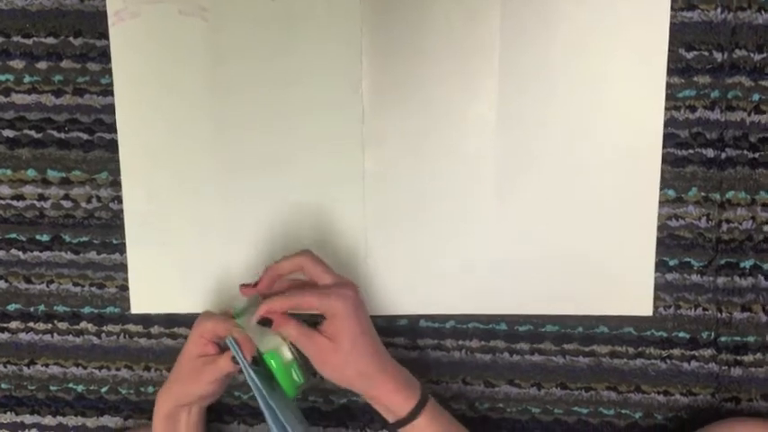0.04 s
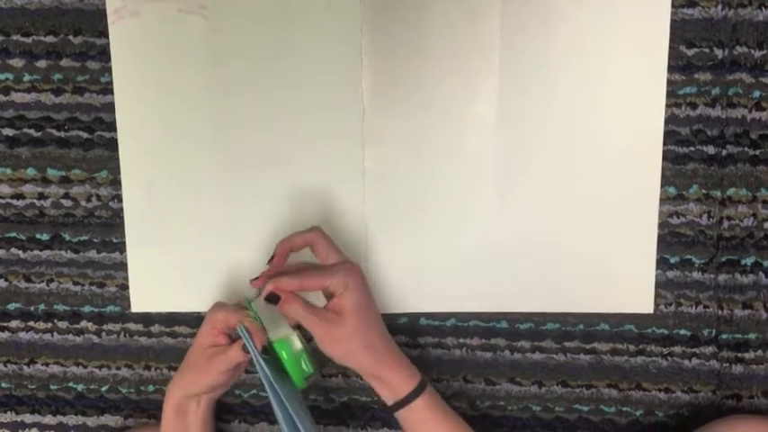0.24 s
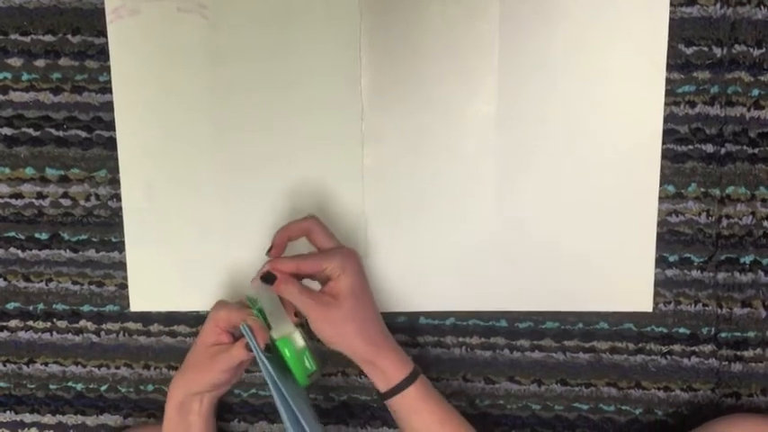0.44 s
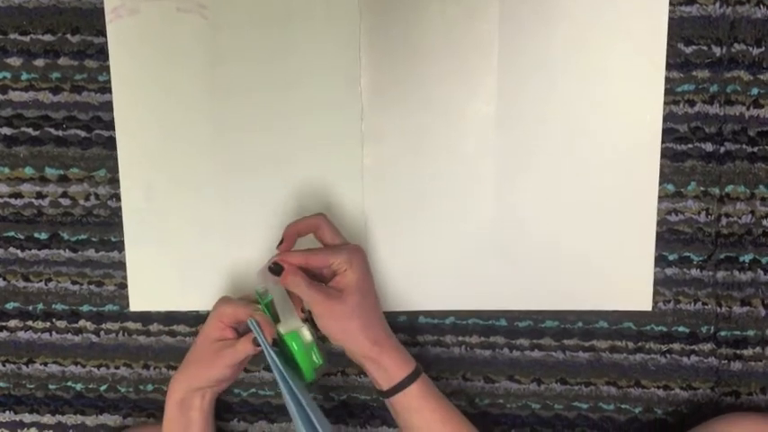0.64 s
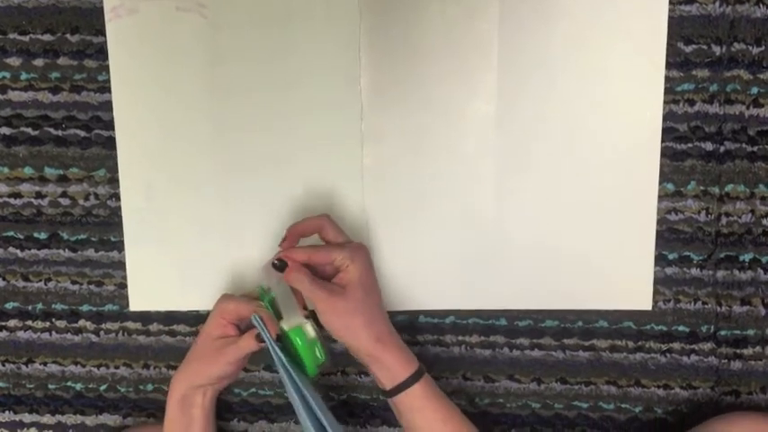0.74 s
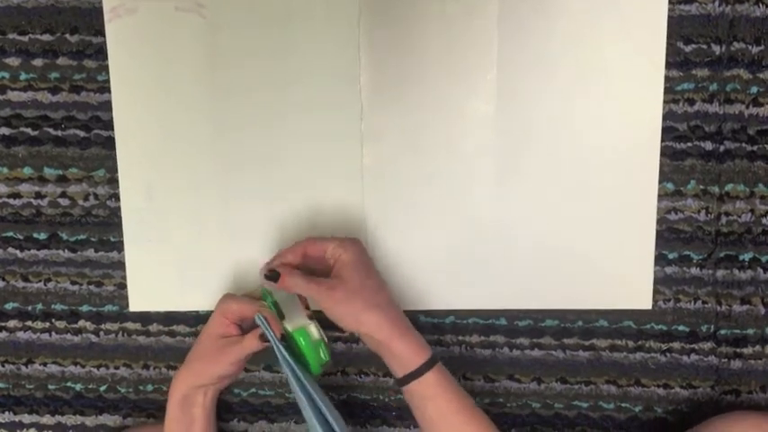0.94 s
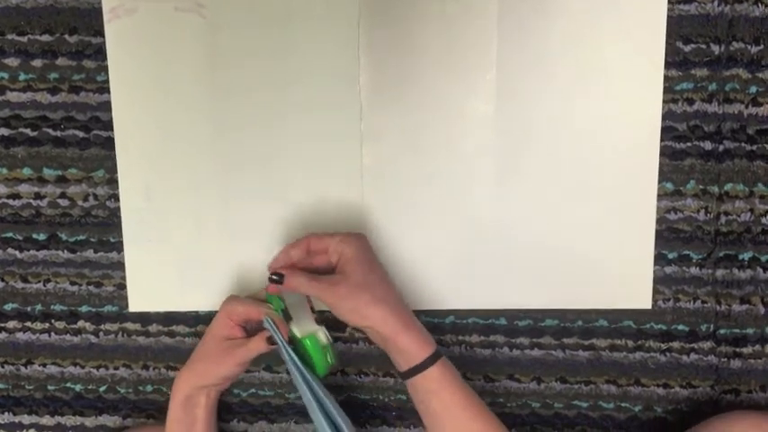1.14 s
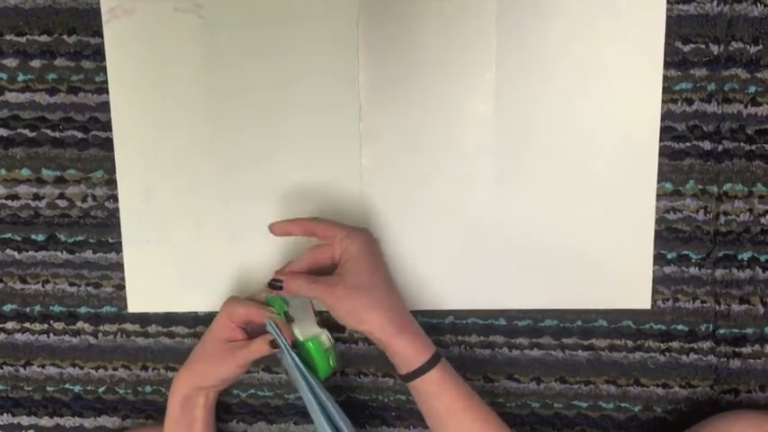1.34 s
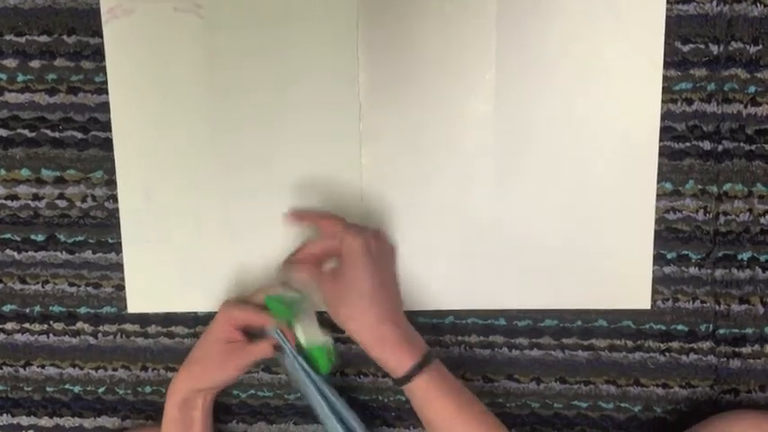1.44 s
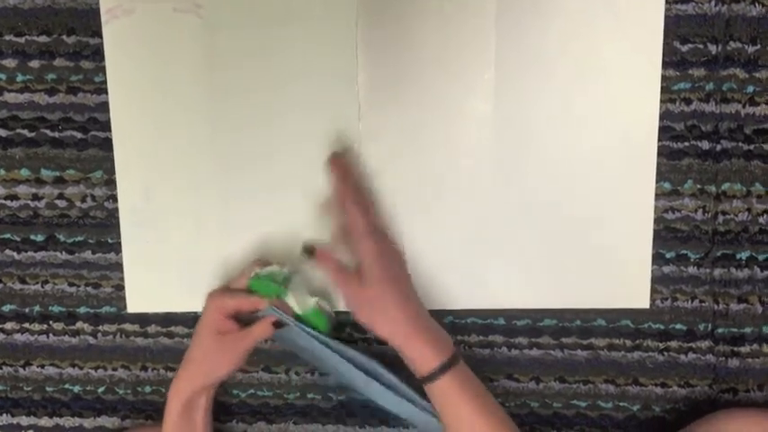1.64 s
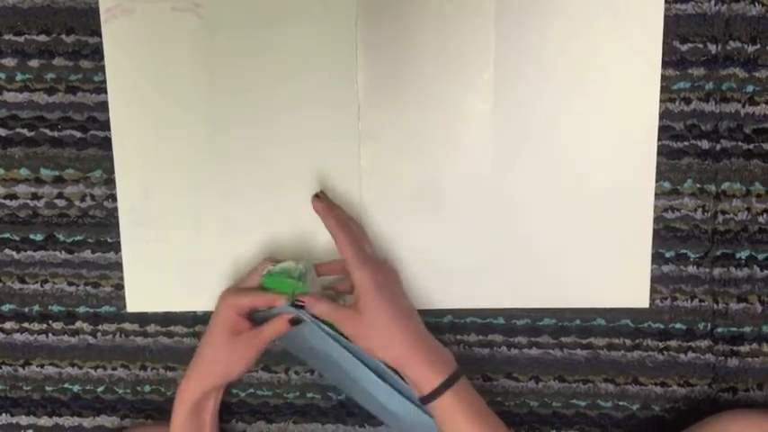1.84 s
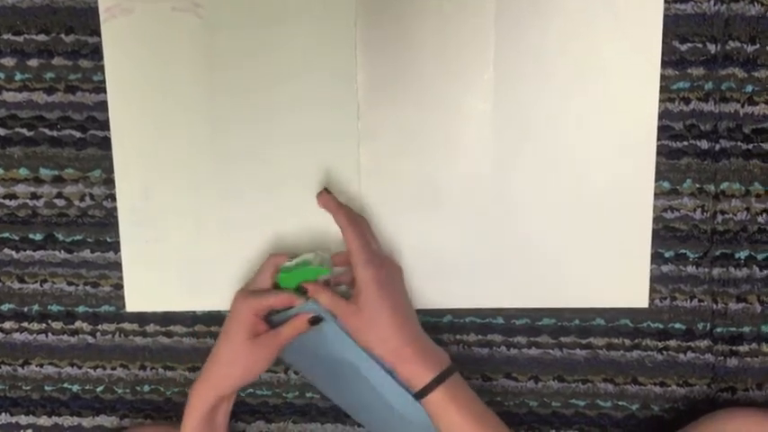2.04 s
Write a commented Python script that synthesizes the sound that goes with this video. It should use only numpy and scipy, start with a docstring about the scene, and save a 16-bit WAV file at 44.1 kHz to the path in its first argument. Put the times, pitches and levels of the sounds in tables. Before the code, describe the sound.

Close by in a quiet room, adhesive tape crackles loudly as it comes off its roll. About a second later come small fingernail clicks and a short, quieter tear, followed by light finger touches over a faint low rumble.

```python
"""Sticky tape is pulled from a small plastic dispenser, close by in a carpeted room.
The roll sticks and slips in seven loud snaps: each time the glue cracks loose and the shell rings.
After a pause the tape rips across the cutter with a soft thump. Nails click, fingers tick and brush
on tape and paper, and dull thuds come and go over a low room rumble and a faint ventilation hum."""
import sys
import numpy as np
from scipy import signal
from scipy.fft import rfft, irfft
from scipy.io import wavfile

SR = 44100
rng = np.random.default_rng(int(sys.argv[2]) if len(sys.argv) > 2 else 0)


def unload_audio(sound):
    """Save the sound as a 16-bit wav file, at the path given as the first command line argument."""
    columns = np.transpose(np.atleast_2d(sound))
    # keep every value between -1 and 1, then stretch to whole-number steps
    steps = np.round(np.clip(columns, -1, 1) * 32767)
    wavfile.write(sys.argv[1], SR, steps.astype(np.int16))


N = 92610
T = np.arange(N) / SR
HZ = np.maximum(np.fft.rfftfreq(N, 1 / SR), 1)


def from_db(db):
    """Turn decibels into a number to multiply by."""
    return 10 ** (np.asarray(db) / 20)


def rms_one(x):
    """Scale a sound to an average power of 1."""
    return x / np.sqrt(np.mean(x ** 2) + 1e-20)


def hit_one(x):
    """Scale a hit to the energy of three milliseconds at power 1."""
    return x / np.sqrt(np.sum(x ** 2) / (.003 * SR) + 1e-20)


def at_hz(points, hz):
    """Read between the rows of a table, with octaves evenly spaced."""
    freqs, values = np.transpose(points)
    return np.interp(np.log(hz), np.log(freqs), values)


def colour(x, curve_db):
    """Turn each frequency up or down, with no sound ahead of a hit (a minimum-phase filter)."""
    cepstrum = irfft(np.log(from_db(curve_db)), N)
    cepstrum[1:N // 2] *= 2
    cepstrum[N // 2 + 1:] = 0
    response = irfft(np.exp(rfft(cepstrum)), N)[:N // 8]
    return signal.fftconvolve(x, response)[:N]


def hump(centre_hz, octaves, floor_db):
    """A curve in dB that favours the frequencies near a centre."""
    bell = np.exp(-.5 * (np.log2(HZ / centre_hz) / octaves) ** 2)
    return 20 * np.log10(bell + from_db(floor_db))


def envelope(start, rise, hold, fall):
    """Swell up to the start, hold, then fade; times in seconds."""
    before, after = np.maximum(start - T, 0), np.maximum(T - start - hold, 0)
    return np.exp(-np.minimum(before / rise + after / fall, 60))


def burst(start, hold, fall):
    """A sudden, fading flurry of tiny cracks."""
    return rng.choice([-1, 1], N) * (T >= start) * envelope(start, 1, hold, fall)


def grains(per_s, spread_db):
    """Random clicks of uneven size."""
    sizes = from_db(spread_db * np.minimum(rng.exponential(1, N), 4))
    return sizes * rng.choice([-1, 1], N) * (rng.random(N) < per_s / SR)


def ringing(start, tones, scatter_db=1.7, detune=.011):
    """A struck part's own tones swell and die in milliseconds, a little differently each time."""
    age, ring = np.clip(T - start, 0, .03), 0
    for hz, db, peak_s in tones:
        louder, sharper = rng.standard_normal(2)
        wave = np.sin(2 * np.pi * hz * (1 + detune * sharper) * age)
        swell = age / peak_s * np.exp(-age / peak_s)
        ring = from_db(db + scatter_db * louder) * swell * wave - ring  # neighbours swing opposite ways
    return hit_one(ring)


# How strong the room noise is from low to high: f/Hz, relative level/dB
RUMBLE_COLOUR = [(20, -24.5), (38, -20), (55, -7), (68, -6.5), (88, -2.5), (112, -3), (150, -6),
                 (210, -11.5), (300, -9), (420, -21), (550, -24.5), (720, -21), (1100, -27.5), (2000, -30),
                 (5000, -36), (10000, -41.5), (15000, -43.5)]
def rumble(level_db=-61.5):
    """Steady low room noise with a faint hiss."""
    spectrum = rfft(rng.standard_normal(N)) * from_db(at_hz(RUMBLE_COLOUR, HZ))
    return from_db(level_db) * rms_one(irfft(spectrum, N))


# The tones of the ventilation: f/Hz, level/dB
VENT_TONES = [(57, -71.5), (113, -65.5), (305, -74.5), (668, -83.5), (850, -84.5)]
def ventilation(width_hz=5):
    """The ventilation hums in narrow, wavering bands of noise."""
    out = 0
    for hz, db in VENT_TONES:
        band = rfft(rng.standard_normal(N)) / (1 + ((HZ - hz) / width_hz) ** 2)
        out = out + from_db(db) * rms_one(irfft(band, N))
    return out


# How long the room takes to fade by 60 dB: f/Hz, t/s
ROOM_FADE = [(300, 0.52), (1500, 0.19), (3000, 0.23), (5000, .25), (9000, 0.16), (15000, 0.12)]
# How much sound the room gives back: f/Hz, relative level/dB
ROOM_COLOUR = [(200, -4.5), (800, -4.5), (2700, -7), (5000, -8), (9000, -11), (14000, -10)]
def room(x, delay_s=.0031, build_s=.0015, echo_s=.0152, echo_db=-17.5):
    """The nearest wall sends one echo; the rest blur into a tail whose high notes die sooner."""
    t, tail = T[:SR // 2], 0
    edges = np.geomspace(150, 18000, 12)
    build = 1 - np.exp(-np.maximum(t - delay_s, 0) / build_s)
    for low, high in zip(edges, edges[1:]):
        bandpass = signal.butter(2, [low, high], "band", fs=SR, output="sos")
        fade = from_db(-60 * t / at_hz(ROOM_FADE, np.sqrt(low * high)))
        band = signal.sosfilt(bandpass, rng.standard_normal(len(t))) * build * fade
        tail = tail + band * np.sqrt(2 * (high - low) / SR / np.sum(band ** 2))
    delayed = np.interp(T - echo_s, T, x, left=0)
    echo = from_db(echo_db) * colour(delayed, hump(2900, octaves=.96, floor_db=-17))
    return colour(signal.fftconvolve(x, tail)[:N], at_hz(ROOM_COLOUR, HZ)) + echo


# Dull low thuds, one of them the thump of the tape tearing off: t/s, level/dB, centre f/Hz
THUDS = [(.03, -57, 61.5), (0.06, -57, 161), (0.224, -55.5, 323), (.70, -53, 101.5), (0.911, -57.5, 150),
         (.90, -61.5, 278), (1.341, -56, 116.3), (1.43, -55.5, 81), (1.492, -59.5, 234), (1.57, -59.5, 66),
         (1.84, -61.5, 312), (2.071, -56.5, 110.8)]
def low_thuds(cycles=3.2):
    """Each thud is a narrow band of low noise that lasts only a few swings."""
    out = 0
    for start, db, hz in THUDS:
        shape = envelope(start, rise=.01, hold=cycles / hz, fall=cycles / hz / 2)
        thud = shape * colour(rng.standard_normal(N), hump(hz, octaves=.25, floor_db=-63.5))
        out = out + from_db(db) * rms_one(thud) * np.sqrt(np.mean(shape ** 2))
    return out


# An opening hiss like the fading room echo of a tape snap, then two finger brushes:
# t/s, level/dB, rise/s, fall/s
HISSES = [(.002, -44, 0.0075, 0.031), (1.958, -61.5, 0.0028, 0.012), (2.012, -70.5, 0.011, 0.026)]
# The tone of the hiss: f/Hz, relative level/dB
HISS_COLOUR = [(200, -11.5), (800, -10), (1400, -4.5), (2600, -2.5), (4300, 2), (6000, -4), (8000, -8),
               (11000, -18), (15000, -23)]
def short_hisses():
    """Countless tiny clicks blur into a hiss that swells and fades."""
    hiss = rms_one(colour(grains(per_s=12000, spread_db=2.5), at_hz(HISS_COLOUR, HZ)))
    swells = sum(from_db(db) * envelope(start, rise, 0, fall) for start, db, rise, fall in HISSES)
    return hiss * swells


# Light touches: t/s, level/dB, centre f/Hz, width/octaves, fall/s
FINGER_TICKS = [(0.1355, -54, 3200, 0.73, 0.0049), (0.839, -67, 6000, .6, 0.00075),
                (1.062, -64.5, 4500, 0.94, 0.0009), (1.450, -57, 3830, 0.56, 0.0021),
                (1.482, -52, 3600, 0.6, 0.0042), (1.510, -49.5, 2500, 0.41, 0.0046),
                (1.843, -66, 5900, 0.29, 0.0013), (1.862, -55, 1304, 0.094, 0.0028)]
def finger_ticks(hold_s=.0017):
    """Fingers touch tape and paper; each tick has its own brightness and length."""
    out = 0
    for start, db, hz, width, fall in FINGER_TICKS:
        tick = colour(burst(start, hold_s, fall), hump(hz, width, floor_db=-32.5))
        out = out + from_db(db) * hit_one(tick)
    return out


# Hard taps on the cutter: t/s, level/dB, centre f/Hz, width/octaves
CUTTER_TAPS = [(1.0343, -48, 4230, 0.75), (1.4650, -43.5, 5800, 0.79), (1.4930, -42.5, 3830, 1),
               (1.5013, -45, 3120, 0.33), (1.8604, -47.5, 2530, 0.75), (1.9614, -53.5, 3880, 0.13)]
# The tones the cutter rings with: f/Hz, relative level/dB
CUTTER_TONES = [(1330, 2), (2000, -3.5), (2780, 1.5), (3400, -1), (4150, -3.5), (4750, -3), (5820, -1),
                (6550, 0.5), (8100, -3)]
def cutter_clicks(peak_s=.00085, grit_db=-9):
    """Nails and tape ring the cutter with a little grit; each tap favours some of its tones."""
    out = 0
    for start, db, centre_hz, width in CUTTER_TAPS:
        ring = ringing(start, [(hz, tone_db, peak_s) for hz, tone_db in CUTTER_TONES])
        grit = from_db(grit_db) * hit_one(burst(start, hold=.0017, fall=peak_s))
        click = colour(ring + grit, hump(centre_hz, width, floor_db=-22))
        out = out + from_db(db) * hit_one(click)
    return out


# The tone of the rip: f/Hz, relative level/dB
TEAR_COLOUR = [(100, -7), (330, 5.5), (460, -11.5), (620, 1), (900, -17), (1500, -0.5), (3100, 2.5),
               (5000, -3), (10000, -8), (15000, -21.5)]
def tape_tear(start=1.493, level_db=-42):
    """The tape parts on the cutter's teeth in a quick run of tiny breaks."""
    rip = rms_one(colour(grains(per_s=4000, spread_db=5.5), at_hz(TEAR_COLOUR, HZ)))
    return from_db(level_db) * rip * envelope(start, rise=.0052, hold=.0077, fall=.0054)


# The shell's longer-lasting tones: f/Hz, relative level/dB
AFTER_TONES = [(2217, -8), (3133, -8), (4103, -11.5), (4262, -10.5), (4380, -9.5), (4780, -6)]
def after_ring(start, fade_s=.21):
    """A thin ring stays in the shell after a snap, dropping 60 dB in the fade time."""
    age = np.maximum(T - start, 0)
    tones = sum(from_db(db) * np.sin(2 * np.pi * hz * age) for hz, db in AFTER_TONES)
    return from_db(-60 * age / fade_s) * tones


# Slips of the roll: t/s, level/dB, bass/dB, middle/dB, treble/dB, top/dB,
# crack compared with ring/dB, after-ring compared with snap/dB
ROLL_SLIPS = [(0.2488, -18.5, -2.5, -2, -1.5, 5, -8, -23), (0.2562, -19.5, -11, -2, -1, 2.5, -9, -16.5),
              (0.2653, -20.5, -2.5, 3, 8, 5, -2.5, -25.5), (0.2741, -20, -7, 1, 1.5, -0.5, -7, -23),
              (0.3445, -19.5, -1, 0.5, 1.5, 2, -7.5, -29.5), (0.3542, -18.5, -0.5, 2, 2, 0, -5, -27),
              (0.4437, -16.5, 6, 3, 2, -1, -7.5, -30)]
# The tones the plastic shell rings with: f/Hz, relative level/dB, time to peak/s
SHELL_TONES = [(362, -27, .0007), (610, -19.5, 0.001), (1120, -13.5, .0007), (1600, -12, .0007),
               (2224, -9.5, 0.0008), (2524, -9.5, 0.00088), (3166, -6.5, 0.0012), (4240, 2.5, 0.00083),
               (4620, -16, 0.0012), (6100, -9.5, 0.00067), (7860, -10, 0.0006), (9720, -20.5, 0.0009),
               (11450, -22.5, .0007)]
# The tone of the glue letting go: f/Hz, relative level/dB
CRACK_COLOUR = [(100, -31), (300, -8), (700, -8.5), (1500, 2), (2800, 4.5), (5000, 1), (8000, -3),
                (11000, -14.5), (15000, -20)]
# The tone of a snap as it spreads in all directions: f/Hz, relative level/dB
SPREAD_COLOUR = [(200, -18.5), (500, -17.5), (760, -7.5), (1750, -4.5), (2500, 3.5), (3100, 2.5),
                 (3600, -6.5), (4200, 4), (4900, -2.5), (7500, -8), (9700, -14), (15000, -27.5)]
def tape_snaps(ring_lag_s=.0002, spread_db=-3.5, tone_share=.6):
    """The glue cracks loose and the shell rings; gives the close sound and what enters the room."""
    direct, into_room = 0, 0
    # Four frequency ranges that each slip turns up or down.
    bass = 1 / (1 + (HZ / 1700) ** 4)
    middle = np.exp(-.5 * (np.log2(HZ / 2700) / .3) ** 2)
    top = 1 / (1 + (9000 / HZ) ** 8)
    treble = 1 / (1 + (5200 / HZ) ** 6) - top
    for start, db, bass_db, middle_db, treble_db, top_db, crack_db, after_db in ROLL_SLIPS:
        ring = ringing(start + ring_lag_s, SHELL_TONES)
        crack = hit_one(colour(burst(start, hold=.0008, fall=.0022), at_hz(CRACK_COLOUR, HZ)))
        tone = bass_db * bass + middle_db * middle + treble_db * treble + top_db * top
        snap = hit_one(colour(ring + from_db(crack_db) * crack, tone))
        direct = direct + from_db(db) * (snap + from_db(after_db) * after_ring(start))
        # The room gets a plain click with part of this slip's tone.
        pulse = signal.unit_impulse(N, int(start * SR))
        spread = hit_one(colour(pulse, tone_share * tone + at_hz(SPREAD_COLOUR, HZ)))
        into_room = into_room + from_db(db + spread_db) * spread
    return direct, into_room


def scene():
    """Add everything up in one channel; the snaps, rip, ticks and clicks echo in the room."""
    snaps, snaps_into_room = tape_snaps()
    handling = tape_tear() + finger_ticks() + cutter_clicks()
    echoes = room(snaps_into_room + from_db(-3) * handling)
    return (snaps + handling + echoes + short_hisses() + low_thuds() + rumble() + ventilation())[None]


def record(dry, cutoff_hz=15300):
    """Cut off the very highest frequencies steeply."""
    return signal.sosfilt(signal.ellip(10, .2, 70, cutoff_hz, fs=SR, output="sos"), dry)


dry = scene()
out = record(dry)
unload_audio(out)
```